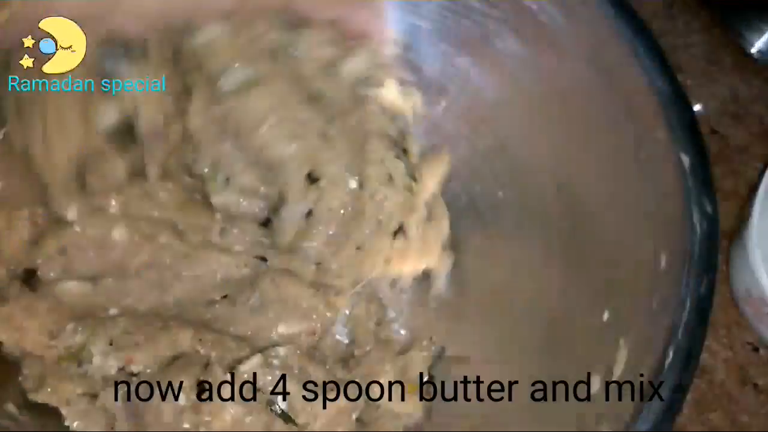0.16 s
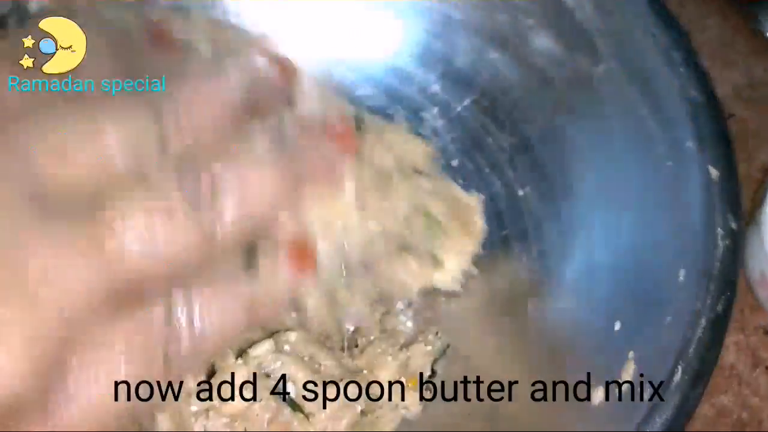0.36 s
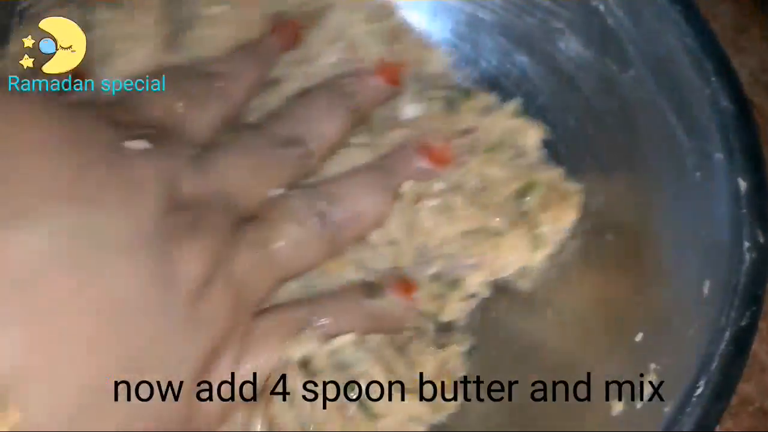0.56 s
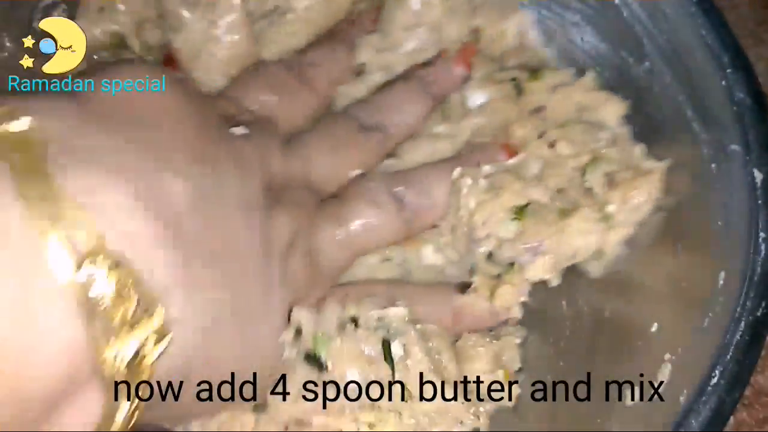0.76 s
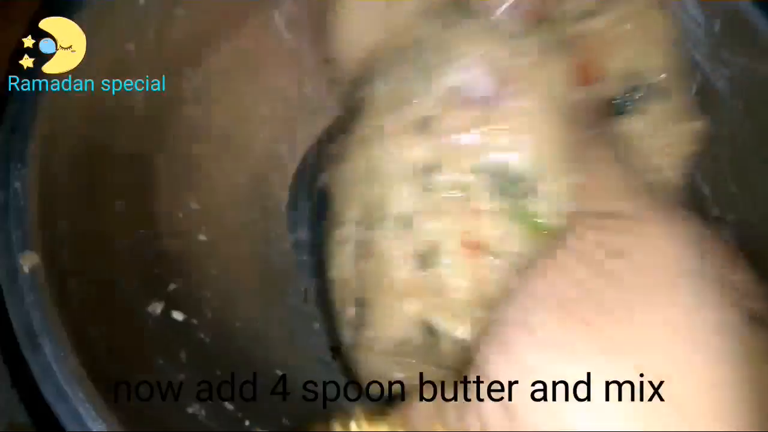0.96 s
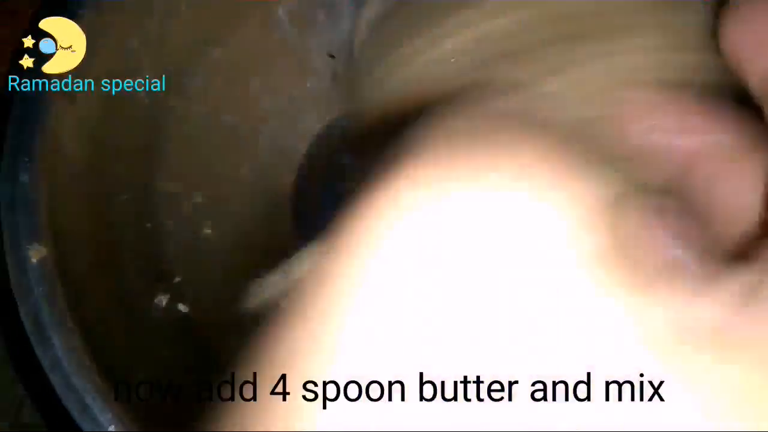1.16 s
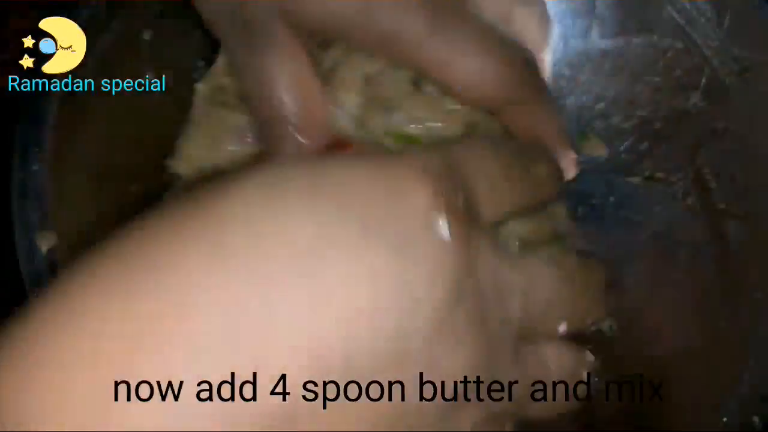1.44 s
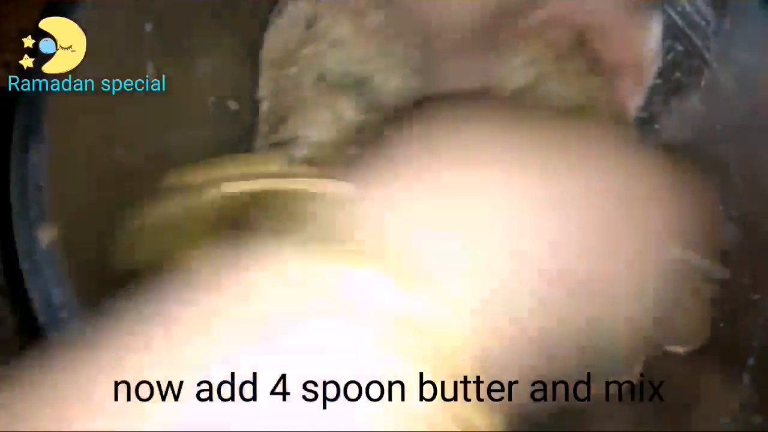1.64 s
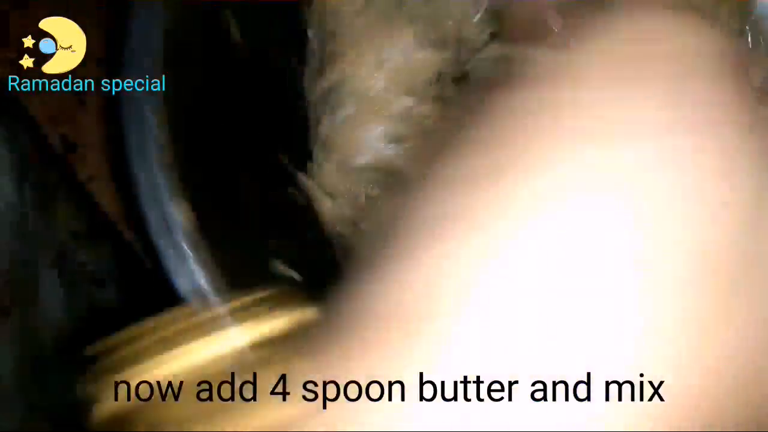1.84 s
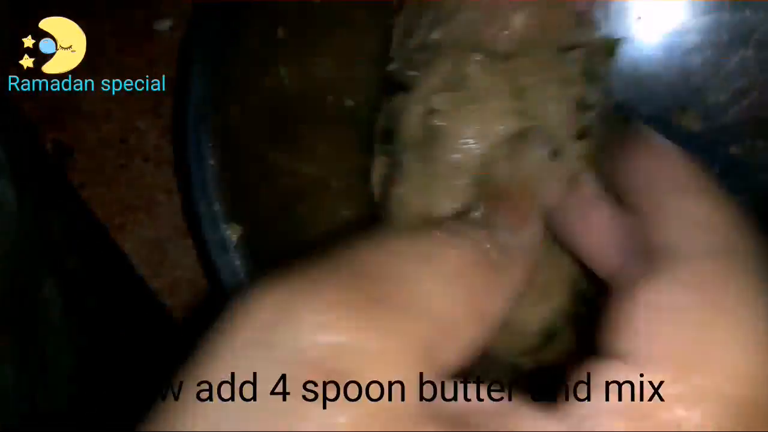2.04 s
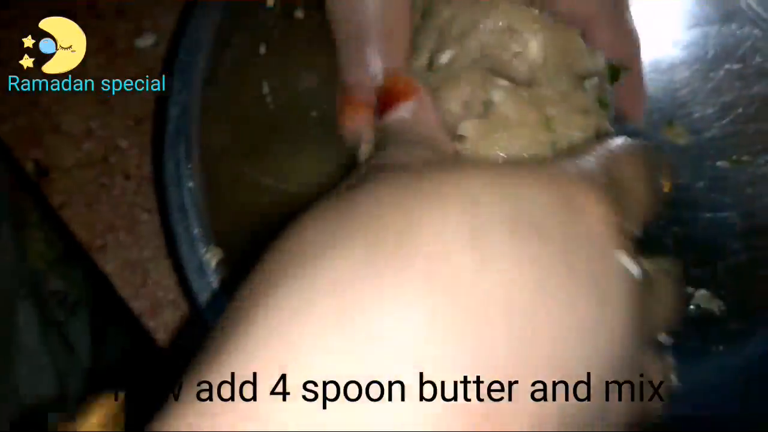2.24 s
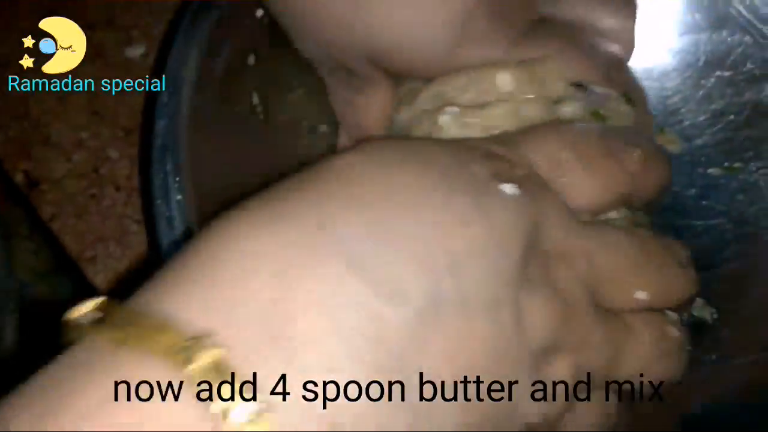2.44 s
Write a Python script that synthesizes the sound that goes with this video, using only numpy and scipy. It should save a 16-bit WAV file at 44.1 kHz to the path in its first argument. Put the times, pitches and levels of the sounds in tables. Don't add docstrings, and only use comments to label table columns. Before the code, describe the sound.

Close phone microphone in a small kitchen: soft wet squelching and tiny snaps of kneaded meat over low thuds, then sudden bright steel clanks, a heavy rattling landing, and a low hum dying away.

```python
import sys
import numpy as np
from scipy import signal
from scipy.fft import rfft, irfft
from scipy.io import wavfile
from scipy.ndimage import uniform_filter1d

SR = 44100
rng = np.random.default_rng(int(sys.argv[2]) if len(sys.argv) > 2 else 0)


def to_wav(s):
    ch = np.atleast_2d(s).T
    pcm = np.round(np.clip(ch, -1, 1) * 32767)
    wavfile.write(sys.argv[1], SR, pcm.astype(np.int16))


def convert_level_to_amplitude(level_db):
    exponent = np.asarray(level_db, float) / 20
    return 10 ** exponent


N = 114660
T = np.arange(N) / SR
MODE_SCATTER_DB, PATCHY_DB, DROP_T60_S = 2.0, 2.2, 0.058


def colour(x, table):
    hz = np.maximum(np.fft.rfftfreq(N, 1 / SR), 1)
    points = np.array(table)
    gain_db = np.interp(np.log(hz), np.log(points[:, 0]), points[:, 1])
    y = irfft(rfft(x) * convert_level_to_amplitude(gain_db), N)
    return y / np.sqrt(np.mean(y ** 2))


def wide(middle, b):
    side = signal.lfilter(*signal.butter(1, 840, "high", fs=SR), b)
    return np.array([middle + side, middle - side])


def noise(table):
    return wide(*(colour(rng.standard_normal(N), table) for _ in range(2)))


def below(x, hz):
    return signal.sosfilt(signal.butter(2, hz, fs=SR, output="sos"), x)


def fade(start_s, t60_s, rise_s=0.00032):
    u = np.maximum(T - start_s, 0)
    return (1 - np.exp(-u / rise_s)) * np.exp(-np.log(1000) * u / t60_s)


def walk(rate_hz):
    k = int(SR / rate_hz)
    steps = np.repeat(rng.standard_normal(N // k + 1), k)
    return 0.81 * uniform_filter1d(uniform_filter1d(steps, k), k)[:N]


def ring(modes, hits, scatter_db, turn, rise_s=0.000095, rough_db=0., rough_hz=40.):
    out = np.zeros((2, N))
    ports = rng.standard_normal((len(modes), 2))
    waver = [(convert_level_to_amplitude(rough_db * walk(rough_hz)), rough_db / 5 * walk(rough_hz)) for _ in modes]
    for start_s, hit_db in hits:
        chance = rng.standard_normal((len(modes), 2))
        for (hz, mode_db, t60_s), (luck, phase), (pan, lag), (swell, slip) in zip(modes, chance, ports, waver):
            i = int(start_s * SR)
            j = min(int((start_s + min(.6, t60_s + 4 * rise_s)) * SR), N)
            u = T[i:j] - start_s
            env = convert_level_to_amplitude(hit_db + mode_db + scatter_db * luck) * swell[i:j]
            env = env * (1 - np.exp(-u / rise_s)) * np.exp(-np.log(1000) * u / t60_s)
            for port, sign in enumerate((1, -1)):
                angle = 2 * np.pi * hz * u + 0.96 * phase + sign * turn * lag + slip[i:j]
                out[port, i:j] += env * convert_level_to_amplitude(sign * 1.8 * pan) * np.sin(angle)
    return out


# start_s, level_db, brightness_db_per_octave
EFFORT = [(0, -49.5, -3), (0.148, -39, 0.5), (0.301, -43, -1.5), (0.472, -38.5, 1), (0.521, -48.5, 0),
          (.72, -43, 0.5), (0.882, -49, 0), (1.09, -42.5, 0), (1.191, -51, -2), (1.233, -44, 4.5),
          (1.3, -56.5, 8.5), (1.344, -44, -0.5), (1.45, -46, 2.5), (1.53, -50.5, 0.5), (1.6, -52, 7),
          (1.699, -41, -1), (2.35, -59.5, 5), (2.501, -50.5, 0.5)]
# pitch_hz, level_db
MINCE_TONE = [(240, -55), (500, -20), (1200, -12), (1900, -8.5), (2540, -3), (4000, -6), (6760, -0.5),
              (9400, -8), (10900, -15), (12500, -9), (15400, -34)]
# start_s, peak_db, level_db of the part under 5 kHz
MEAT_SNAPS = [(0.0397, -26, -60), (0.0921, -23.5, -47), (0.116, -35, -37), (0.1496, -33.5, -32),
              (0.1715, -27.5, -41), (0.225, -40, -47), (0.342, -23, -36.5), (0.3625, -26.5, -47),
              (0.39, -28, -35), (0.4527, -23, -35), (0.4796, -21.5, -39), (0.5496, -29.5, -62),
              (0.575, -32.5, -59), (0.606, -34, -38), (0.6523, -45, -38), (0.6686, -35, -50),
              (0.7952, -29.5, -61), (0.9084, -33, -48), (0.951, -33, -58), (0.9836, -37.5, -72),
              (1.0343, -27, -37), (1.0829, -29, -33.5), (1.0955, -27.5, -53), (1.215, -42, -63),
              (1.3416, -22.5, -36), (1.3446, -24, -34.5), (1.4166, -27.5, -42.5), (1.5418, -28.5, -57),
              (1.6469, -38, -48)]


def mince():
    crackle_per_s, crackle_spread_db, crackle_db, shared_db = 160, 6, -5, 1.2
    effort = np.array(EFFORT)
    level_db = np.interp(T, effort[:, 0], effort[:, 1])
    bright = np.interp(T, effort[:, 0], effort[:, 2])
    bed, shared = 0, walk(34)
    for hz in 450 * 1.6 ** np.arange(8):
        size_db = crackle_spread_db * np.minimum(rng.exponential(size=(2, N)), 3.5)
        size = convert_level_to_amplitude(size_db) * rng.choice([-1., 1.], (2, N))
        pops = (rng.random((2, N)) < crackle_per_s / SR) * size
        wet = [v / v.std() * convert_level_to_amplitude(crackle_db) + rng.standard_normal(N) for v in pops]
        mix = wide(*(colour(v, MINCE_TONE) for v in wet))
        edges = [hz / 1.27, min(hz * 1.27, 19000)]
        band = signal.sosfilt(signal.butter(2, edges, "band", fs=SR, output="sos"), mix)
        band_db = shared_db * shared + PATCHY_DB * walk(12) + bright * np.log2(hz / 5000)
        bed = bed + band * convert_level_to_amplitude(band_db)
    raw = noise(MINCE_TONE)
    low = below(raw, 4800)
    high = raw - low
    snaps = 0
    for start_s, peak_db, low_db in MEAT_SNAPS:
        snap = convert_level_to_amplitude(peak_db - 7) * high + convert_level_to_amplitude(low_db + 7.5) * low
        snaps = snaps + fade(start_s, 0.012, 0.00033) * snap
    return convert_level_to_amplitude(level_db - 3.0) * bed + snaps + peel()


# pitch_hz, level_db per Hz
PALM_TONE = [(3500, -27), (6000, -14), (7500, -0.5), (10500, -2.3), (12000, -13), (15000, -25)]


def peel():
    start_s, end_s, level_db, growth_db, ticks_per_s = .703, .7256, -33, 16, 1500
    grow = convert_level_to_amplitude(level_db + growth_db * (T - end_s) / (end_s - start_s)) * (T > start_s) * (T < end_s)
    ticks = (rng.random(N) < ticks_per_s / SR) * convert_level_to_amplitude(2.2 * rng.standard_normal(N)) * grow
    env = signal.lfilter([1], [1, -.9], ticks) + .4 * grow
    env = env + convert_level_to_amplitude(level_db + 9) * fade(end_s - .0006, .004, .0001)
    return env * noise(PALM_TONE)


# pitch_hz, level_db, t60_s
WALL_MODES = [(1892, 7.5, 0.2), (2484, -5.5, .3), (3010, -6, 0.26), (3348, -16.5, 0.5), (3564, -10, 0.081),
              (4068, -4, 0.28), (4503, -19, 0.41), (5410, -14.5, 0.2), (5870, -12.5, .22),
              (6250, -6.5, 0.09), (6632, -13, 0.31), (7960, -16, 0.1)]
# pitch_hz, level_db, t60_s
SWELL_MODES = [(694, -40.5, 1.5), (1254, -21, 0.82), (1660, -33, 1.2)]
# pitch_hz, level_db, t60_s
RIM_MODES = [(676, 4.5, 1), (1320, -12.5, 0.75), (3150, -24, .3), (3880, -17, 0.94), (4492, -9.5, .6),
             (5580, -13.5, 0.093), (6804, -3.5, 0.18)]
LIFTED_PITCHES = [680, 870, 970, 1166, 1475, 1954, 2163, 3072, 3919, 6150]
# level_db, t60_s
LIFTED_RINGS = [(2.5, 0.17), (-4, 0.41), (0.5, 0.67), (-4.5, 0.87), (-17.5, 0.45), (3, 0.62), (0, 0.82),
                (-2.5, 0.2), (-22.5, .1), (-17, .15)]
# start_s, ring_db, clang_db, clang_t60_s, low_db of the clang under 4.5 kHz
WALL_STRIKES = [
    (1.7211, -36, -18, 0.021, -10.5),
    (1.727, -63, -33, 0.22, -5.5),
    (1.7425, -20.5, -14, 0.049, -3),
    (1.756, -18, -23.5, 0.16, -4),
]
RIM_STRIKES = [
    (1.9381, -14.5, -20, 0.28, -13),
    (1.9887, -11, -23, 0.23, -8.5),
]
LIFTED_STRIKES = [
    (1.9887, -28, -41, 0.16, -2.2),
    (2.0341, -24, -15, 0.35, 1),
    (2.0575, -10.5, -18, 0.72, 7),
    (2.075, -24.5, -31, 0.23, 9),
]
# pitch_hz, level_db, t60_s
BANGLE_MODES = [(5830, -4.5, 0.18), (6360, 2, 0.079), (6660, 4.6, 0.08), (7600, -5, 0.092)]
# start_s, level_db
BANGLE_KNOCKS = [
    (1.7215, -23.5),
    (1.7414, -15.5),
    (1.9388, -18.5),
    (2.0354, -17.5),
    (2.1114, -16.5),
]
# pitch_hz, level_db, t60_s
LANDED_MODES = [(191, -0.5, .3), (280.7, 2.5, 0.24), (467, -3.5, 0.17), (600, -0.5, 0.16),
                (664.5, -2, 0.16), (855, -3.5, 0.22)]
# start_s, level_db
LANDINGS = [
    (2.1118, -12),
    (2.129, -23.5),
]
# start_s, counter_db, knock_db, clang_db
BOWL_DROPS = [
    (1.9369, -23.5, -17, -28.5),
    (1.9898, -19, -15.5, -49.5),
    (2.09, -28.5, -15.5, -29),
    (2.1113, -23, -12, -12.5),
    (2.128, -21, -17, -23),
    (2.146, -21.5, -27, -32),
    (2.1601, -26, -36, -23),
    (2.177, -27.5, -26, -39),
    (2.197, -22, -25.5, -32.5),
]
# pitch_hz, level_db per Hz
CLANG_TONE = [(180, -12), (300, -6.5), (719, -14), (1490, -11.5), (1930, -5.5), (2320, -8.5), (3740, -13.5),
              (6340, -2), (15400, -23.5)]


def steel():
    out = ring(BANGLE_MODES, BANGLE_KNOCKS, MODE_SCATTER_DB, 0.17, rough_db=0.5, rough_hz=87.1)
    out = out + ring(LANDED_MODES, LANDINGS, MODE_SCATTER_DB, 0.12, rise_s=0.0014, rough_db=3.)
    lifted_modes = [(hz, *rest) for hz, rest in zip(LIFTED_PITCHES, LIFTED_RINGS)]
    # start_s, sudden drop_db, t60_s after it
    holds = ((WALL_MODES, WALL_STRIKES, (1.936, -14, .03)),
             (RIM_MODES, RIM_STRIKES, (2.037, -8.5, 0.25)),
             (lifted_modes, LIFTED_STRIKES, (2.088, -8.5, 0.28)))
    high, low = 0, 0
    for modes, strikes, (choke_s, drop_db, choke_t60_s) in holds:
        u = np.maximum(T - choke_s, 0)
        choke = convert_level_to_amplitude(drop_db * np.minimum(u / 0.0022, 1) - 60 * u / choke_t60_s)
        hits = [strike[:2] for strike in strikes]
        rung = ring(modes, hits, .5 * MODE_SCATTER_DB, 0.52, rough_db=0.9, rough_hz=45.4)
        if modes is WALL_MODES:
            rung = rung + ring(SWELL_MODES, [(strikes[2][0], 0)], 0, 0.36, rise_s=0.03, rough_db=2.8)
        out = out + choke * rung
        for start_s, _, clang_db, clang_t60_s, low_db in strikes:
            env = choke * convert_level_to_amplitude(clang_db) * fade(start_s, clang_t60_s)
            high = high + env
            low = low + convert_level_to_amplitude(low_db) * env
    drops = sum(convert_level_to_amplitude(clang_db) * fade(start_s, DROP_T60_S) for start_s, _, _, clang_db in BOWL_DROPS)
    raw = noise(CLANG_TONE)
    raw_low = below(raw, 4500)
    clang = convert_level_to_amplitude(5.6 * walk(150)) * ((high + drops) * (raw - raw_low) + (low + drops) * raw_low)
    return out + convert_level_to_amplitude(-5) * clang + dense(clang)


def dense(x):
    hz = np.fft.rfftfreq(N, 1 / SR)
    bank = 0
    for place, damping, weakness in rng.random((140, 3)):
        mode_hz = 900 * 14 ** place
        half_hz = np.log(1000) / (2 * np.pi * .13 * (.5 + damping))
        half_hz = half_hz * max(mode_hz / 4000, 1)
        bank = bank + convert_level_to_amplitude(-14 * weakness) * np.sqrt(mode_hz / half_hz) / (1 + 1j * (hz - mode_hz) / half_hz)
    y = irfft(rfft(x, axis=1) * bank, N, axis=1)
    return y * np.sqrt(np.sum(x ** 2) / np.sum(y ** 2))


# pitch_hz, level_db, t60_s
COUNTER_MODES = [(88.6, -11, 0.38), (150.3, -9, 0.47), (199.1, -1, 0.42), (250.1, -4, 0.37),
                 (283.1, -4.5, 0.4), (331, -8, 0.17), (605, -25, 0.99), (404, -25.5, 0.62)]
# start_s, level_db
SETTLING = [
    (2.134, -20),
    (2.182, -15.5),
]
# start_s, boom_db, thump_db, knock_db
HAND_PUSHES = [(0.019, -30.5, -54, -71), (0.089, -48, -73, -50.5), (0.221, -53, -53, -80),
               (0.432, -73, -79, -75), (0.722, -34.5, -30, -47), (0.928, -49, -67, -80),
               (1.049, -38, -65, -71), (1.089, -31.5, -48, -48.5), (1.144, -35, -34, -38),
               (1.344, -36, -50, -35), (1.412, -32, -82, -77), (1.505, -62, -42, -39),
               (1.521, -52, -38, -53), (1.562, -33.5, -33, -34), (1.587, -58, -38.5, -40),
               (1.743, -40, -45.5, -50), (1.789, -55, -41.5, -60)]
# start_s, level_db, t60_s
BOWL_SHUDDERS = [
    (0.03, -48.5, 0.3),
    (.56, -58, 0.38),
    (0.691, -54, 0.36),
    (1.7426, -39.5, .3),
]
# pitch_hz, level_db per Hz
KNOCK_TONE = [(120, -3), (250, -8), (750, -6), (1100, -5), (1600, -11), (2500, -20), (5000, -23),
              (7000, -62.5)]
# pitch_hz, level_db
RUMBLE_TONE = [(12, -70.5), (20, -31), (86, 3.5), (114, -14), (232, -16.5), (288, -14), (500, -35),
               (650, -45), (1100, -120)]


def counter():
    drops = [drop[:2] for drop in BOWL_DROPS]
    out = ring(COUNTER_MODES, drops, MODE_SCATTER_DB, 0.45, rise_s=0.0072, rough_db=7.0, rough_hz=28.075)
    out = out + ring([(87.6, 0, 0.51)], SETTLING, 0, .05, rise_s=.012)
    out = out * convert_level_to_amplitude(-60 * np.maximum(T - 2.445, 0) / .15)
    booms = [push[:2] for push in HAND_PUSHES]
    out = out + ring([(84.6, 0.025, 0.25)], booms, 0, 0.03, rise_s=0.017)
    soft = [(hz, level_db, t60_s * 0.49) for hz, level_db, t60_s in COUNTER_MODES[1:6]]
    thumps = [(start_s, thump_db) for start_s, _, thump_db, _ in HAND_PUSHES]
    out = out + ring(soft, thumps, MODE_SCATTER_DB, 0.24, rise_s=0.011, rough_db=0.5)
    knocks = 0
    for start_s, _, _, knock_db in HAND_PUSHES:
        knocks = knocks + convert_level_to_amplitude(knock_db) * fade(start_s, 0.085, 0.00058)
    for start_s, _, knock_db, _ in BOWL_DROPS:
        knocks = knocks + convert_level_to_amplitude(knock_db) * fade(start_s, 1.83 * DROP_T60_S)
        knocks = knocks + convert_level_to_amplitude(knock_db - 28.5) * fade(start_s, 0.56, 0.0076)
    for start_s, level_db, t60_s in BOWL_SHUDDERS:
        knocks = knocks + convert_level_to_amplitude(level_db) * fade(start_s, t60_s, 0.0066)
    rumble = convert_level_to_amplitude(-52 + PATCHY_DB * walk(3.7)) * noise(RUMBLE_TONE)
    return out + knocks * noise(KNOCK_TONE) + rumble


# pitch_hz, level_db, t60_s
WOBBLE_MODES = [(196.7, -1.5, 0.51), (253, -0.8, 0.49), (284, -9, 0.51), (157, -8, 0.42)]
# start_s, level_db
NUDGES = [
    (2.17, -23.5),
    (2.245, -28),
]


def wobble():
    return ring(WOBBLE_MODES, NUDGES, MODE_SCATTER_DB, .15, rise_s=0.013, rough_db=4.5, rough_hz=21.94)


def scene():
    room_t60_s, room_db = .3, -17
    dry = 0
    for source, pan_db in ((mince(), 4.0), (steel(), 3.5), (counter(), -1)):
        dry = dry + source * convert_level_to_amplitude(np.array([[pan_db], [-pan_db]]) / 2)
    u = T[:int(.4 * SR)]
    tail = rng.standard_normal((2, len(u))) * np.exp(-np.log(1000) * u / room_t60_s) * (u > .004)
    tail = tail / np.sqrt(np.sum(tail ** 2, axis=1, keepdims=True))
    room = signal.fftconvolve(dry, tail, axes=1)[:, :N]
    return dry + convert_level_to_amplitude(room_db) * room + wobble()


def starve(x):
    gate_db, floor_db, wander_db, loud_db, tilt_db = -7, -83, 3.5, -63, -2.0
    hz, _, z = signal.stft(x, SR, nperseg=2048)
    power = np.sum(np.abs(z) ** 2, axis=0)
    inside = (hz > 260) & (hz < 16000)
    band = np.floor(np.log(1 + hz / 1200) * 9)
    treble = np.maximum(power[inside & (hz > 1800)].mean(axis=0), convert_level_to_amplitude(2 * floor_db))
    keep = np.ones_like(power)
    for b in np.unique(band[inside]):
        rows = inside & (band == b)
        band_hz = hz[rows].mean()
        band_power = power[rows].mean(axis=0)
        over_db = 10 * np.log10(band_power / treble + 1e-12) - gate_db
        over_db = over_db - tilt_db * max(np.log2(band_hz / 2000), 0) - 2.5 * (band_hz < 2000)
        wander = uniform_filter1d(rng.standard_normal(len(over_db)), size=5) * np.sqrt(5)
        keep[rows] = np.clip(over_db + wander_db * wander + .5, 0, 1)
        keep[rows] = np.maximum(keep[rows], band_power > convert_level_to_amplitude(2 * loud_db))
    return signal.istft(z * keep, SR, nperseg=2048)[1][:, :N]


def top_cut(x):
    return signal.sosfilt(signal.butter(12, 15590, fs=SR, output="sos"), x)


def record(dry):
    x = signal.sosfilt(signal.ellip(6, .2, 50, 15600, fs=SR, output="sos"), starve(dry))
    x = signal.lfilter(*signal.butter(2, 45, "high", fs=SR), x)
    return top_cut(np.clip(x, -.97, .97))


dry = scene()
out = record(dry)
to_wav(out)
```